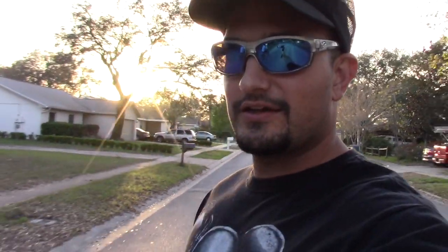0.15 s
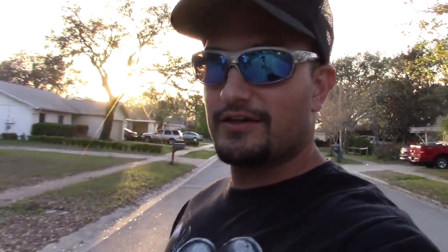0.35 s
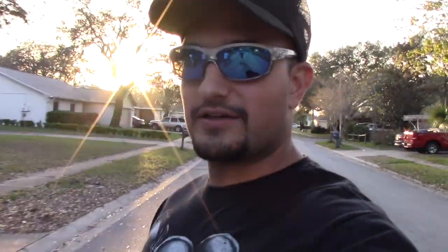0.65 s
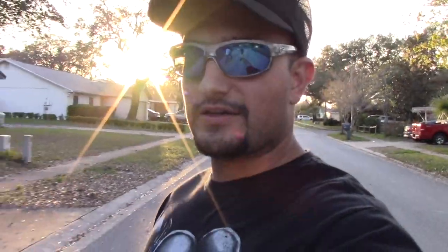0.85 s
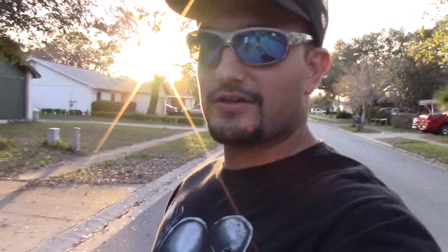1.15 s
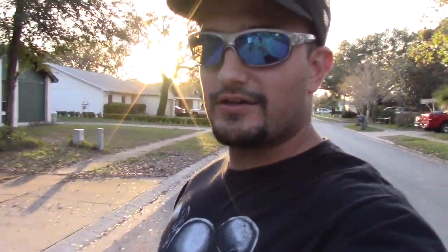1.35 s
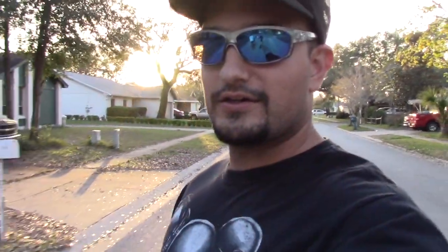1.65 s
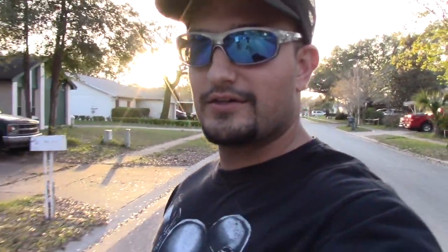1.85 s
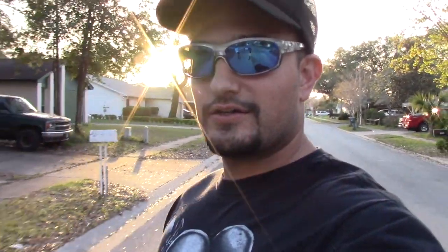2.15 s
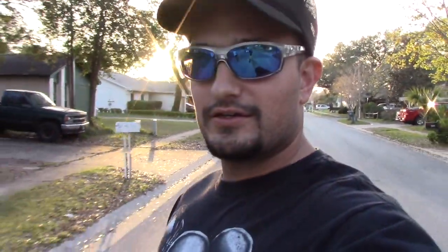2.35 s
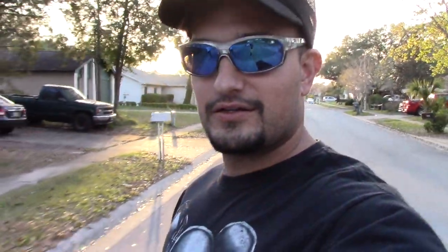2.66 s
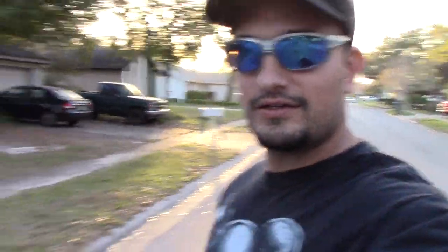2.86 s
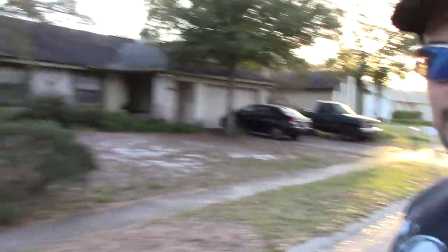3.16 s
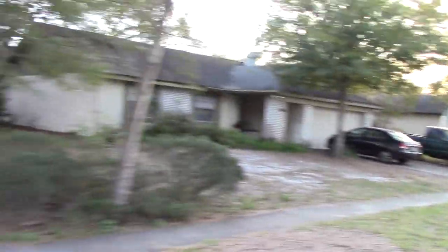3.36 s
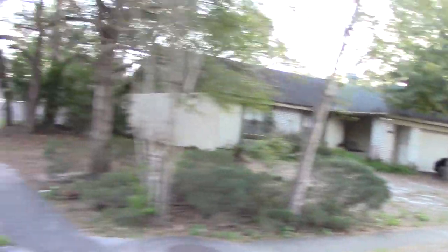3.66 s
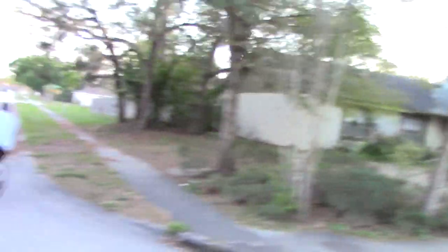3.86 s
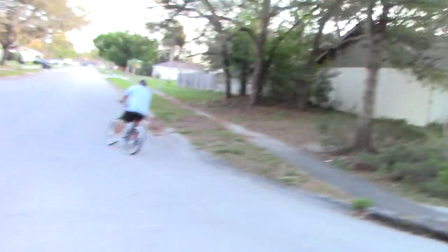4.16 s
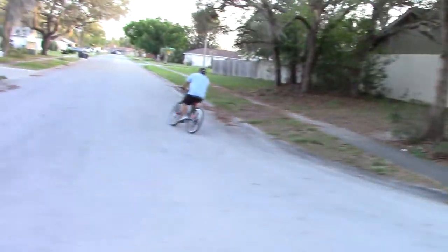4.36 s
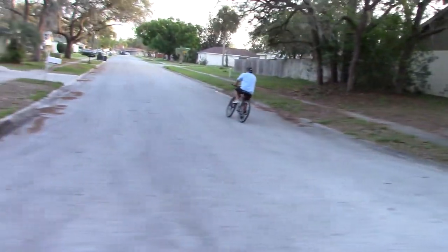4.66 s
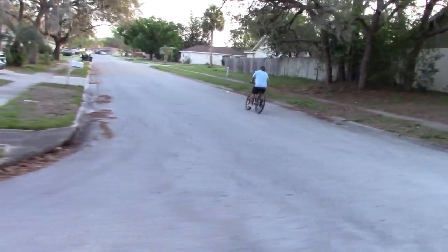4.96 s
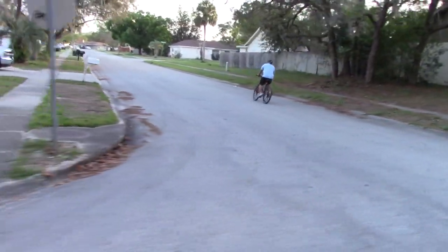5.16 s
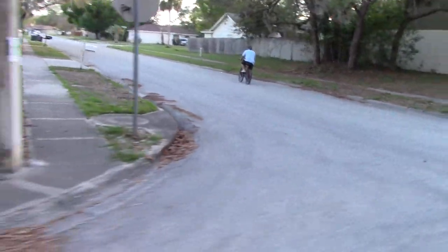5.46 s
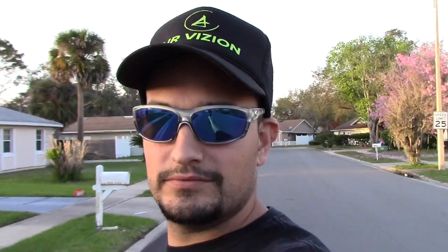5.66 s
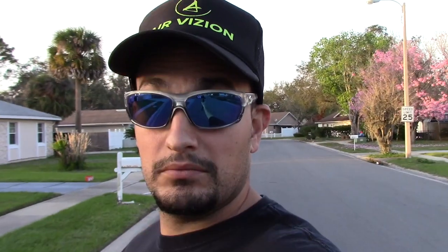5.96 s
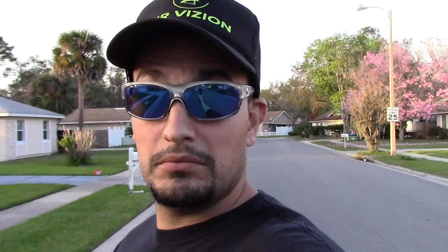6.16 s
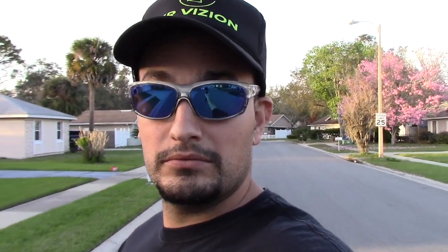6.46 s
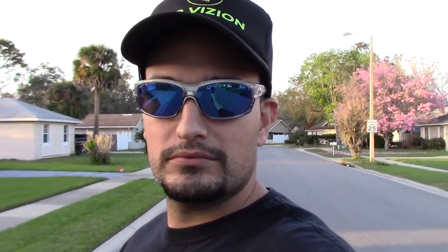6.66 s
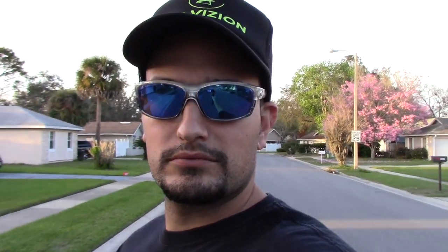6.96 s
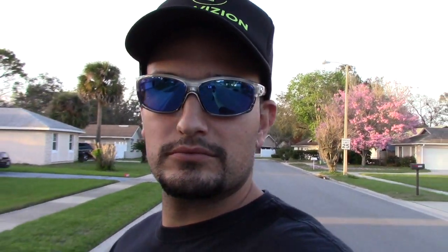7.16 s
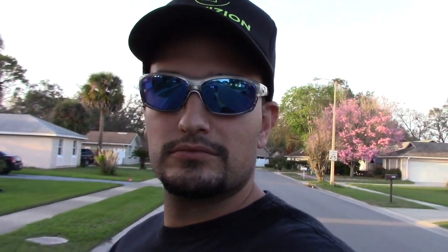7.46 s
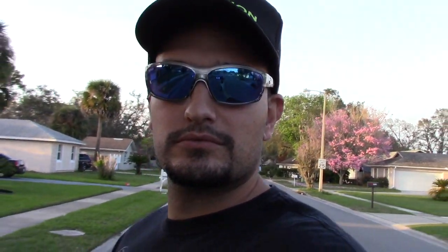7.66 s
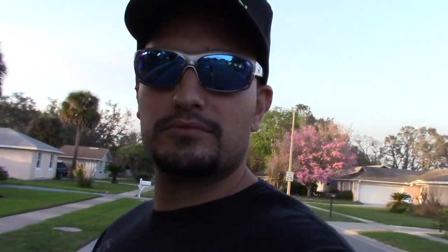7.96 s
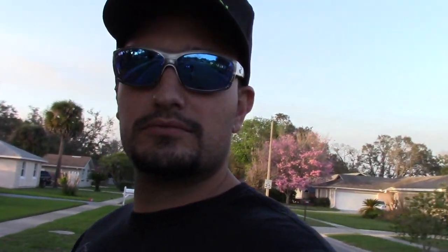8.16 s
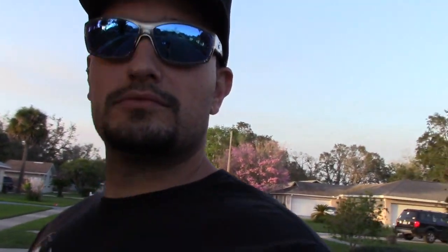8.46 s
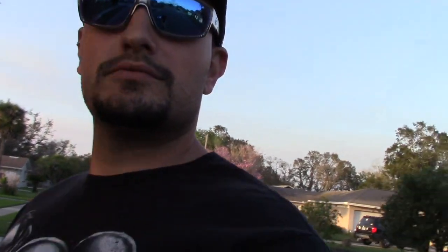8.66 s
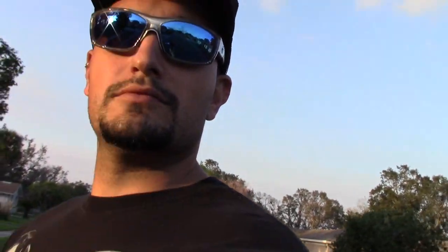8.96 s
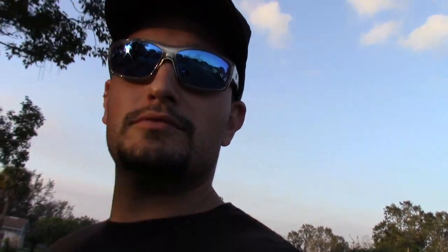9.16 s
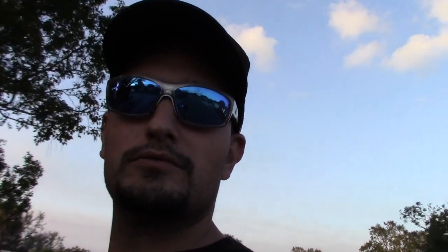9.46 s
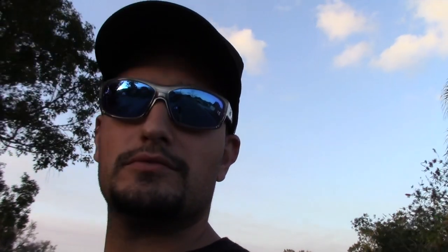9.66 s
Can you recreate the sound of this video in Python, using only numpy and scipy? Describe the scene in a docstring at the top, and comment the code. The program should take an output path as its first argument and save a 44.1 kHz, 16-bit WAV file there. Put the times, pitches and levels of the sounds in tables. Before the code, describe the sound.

Outdoors on a suburban street, a handheld camera microphone rides on a skateboard. Wheels roar over coarse asphalt, a loose hard part knocks and chatters, grit snaps and low wind thumps. Around three and a half seconds a loud headwind tears across the microphone, easing slightly before a sudden cut. A smoother street follows, much quieter: fine wheel hiss, light fluttering gusts and puffs, and a few late clicks and knocks.

```python
"""An electric skateboard rolls over asphalt, its rider holding a camera at arm's length. At first the wheels
roar as shaped noise, a loose hard part rings at the bumps, bright snaps crack, and slow noise buffets the
microphone. At 3.4 s the camera has swung forward and the headwind, noise read faster or slower with the air
speed, tears across its grille. At 5.67 s the scene cuts to a smoother street: fluttering noise makes light
gusts over the hiss of the wheels, with a few late knocks and bright snaps."""
import sys
import numpy as np
from scipy import signal
from scipy.fft import rfft, irfft
from scipy.io import wavfile
from scipy.ndimage import uniform_filter1d, map_coordinates

SR = 44100
rng = np.random.default_rng(int(sys.argv[2]) if len(sys.argv) > 2 else 0)


def transcribe(u):
    """Save the signal u as a 16-bit wav file named by the first command-line argument.

    u: samples, shape (n,) or (channels, n), limited to [-1, 1]; the rate is SR.
    q: integer samples, one column per channel.
    """
    v = np.clip(np.atleast_2d(u).T, -1, 1)
    q = np.round(v * 32767).astype(np.int16)
    wavfile.write(sys.argv[1], SR, q)


N = 433062
T = np.arange(N) / SR
CUT_S = 5.67
OPPOSITE = np.array([[1], [-1]])  # a signal with opposite signs at the left and right port

# All levels in dB are relative: each layer is trimmed again in the mix.

# Roar of the wheels on the coarse street. Each row: time in seconds, level in dB.
ROLL = [(0, -29), (.6, -40), (1.0, -35.5), (2.2, -36.5), (2.55, -34.5), (2.74, -33), (2.86, -32),
        (2.9, -36), (3.03, -39.5), (3.3, -42.5), (5.67, -60)]
# Spectrum of that roar. Each row: frequency in Hz, density in dB per Hz.
ROLL_COLOUR = [(40, -43), (90, -34), (160, -11.5), (330, -4.5), (600, 1), (900, 3), (1200, -2),
               (1600, -5.5), (1950, 4), (2500, -15.5), (4000, -21.5), (8000, -38), (15000, -55)]
# The rumble swells and sinks with the roar: dB of bass for each dB of roar away from the pivot.
RUMBLE_FOLLOWS, RUMBLE_PIVOT_DB, RUMBLE_HZ = 0.73, -38, 460
# The rumble ducks while the camera swings round.
LULL_S, LULL_WIDTH_S, LULL_DB = 3.02, 0.17, -6
# Hiss of the wheels on the coarse and the smooth street. Each row: frequency in Hz, density in dB per Hz.
COARSE_HISS = [(100, -51), (900, -0.5), (2000, 8.5), (3000, 3.5), (4400, -1), (6200, -3), (7500, -11.5),
               (9500, -15.5), (11500, -25), (15000, -54)]
SMOOTH_HISS = [(100, -21), (1000, -9.5), (2000, 8.5), (2900, 3.5), (3600, -1.5), (4350, 3.5), (5100, -2.5),
               (6100, -5), (7200, -13), (9500, -21), (11000, -29), (15000, -41)]
# The coarse hiss follows the roar a little: dB for each dB of roar away from the pivot.
HISS_FOLLOWS, HISS_PIVOT_DB = 0.15, -36.5

# Hardest knocks of the loose part. Each row: start in seconds, level in dB, centre pitch of the ring in Hz,
# crack over the ring in dB.
KNOCKS = [(0.0084, -9, 1969, -2), (0.07, -12, 1940, 5), (0.3069, -18, 1930, 5), (0.3277, -20, 1957, 2),
          (0.3536, -17, 1950, 0), (0.363, -17, 1950, -2), (0.3859, -4.5, 1901, -1), (0.503, -11, 1864, 3.5),
          (0.534, -17, 1950, 0), (0.5527, -12, 1939, -1), (0.5906, -17.5, 1953, 0), (0.652, -15, 1920, 0.5),
          (0.663, -22, 1953, -3), (0.7894, -19.5, 1950, -2), (0.811, -24, 1950, 0), (0.826, -13.5, 1902, 3),
          (0.8384, -14, 1940, 3), (0.9139, -23, 1950, 0), (1.0528, -23, 1950, -3), (1.07, -21, 1950, -3),
          (1.082, -20, 1945, -3), (1.1282, -19.5, 1950, -2), (1.202, -21, 1980, 0), (1.2676, -12, 1973, 0),
          (1.3816, -23, 1947, 2), (1.513, -22, 1954, 5), (1.6854, -20, 1944, 0), (1.9368, -21, 1950, 0),
          (1.9572, -22, 1950, 3), (2.0354, -22, 1950, -2), (2.1881, -19.5, 1950, -1),
          (2.31, -24.5, 1950, 0), (2.345, -18, 1950, 4), (2.3545, -11.5, 1938, -1.5), (2.36, -17, 1942, -4),
          (2.4635, -8, 1922, -2.5), (2.469, -24, 1913, 5), (2.509, -27, 1947, -2), (2.5445, -19, 1948, -4),
          (2.589, -23, 1952, 2), (2.5991, -12, 1960, 1), (2.8333, -12, 1918, -3), (2.9328, -23, 1934, 3),
          (2.9664, -17, 1917, 2), (3.0486, -4, 1962, -4.5), (3.107, -19, 1947, 0),
          (3.1142, -13.5, 1902, -2), (3.119, -16, 1946, -5), (3.1258, -14, 1944, -3),
          (3.1377, -9.5, 1888, 0.5), (3.148, -21, 1951, -8), (9.028, -28, 1954, 11),
          (9.0657, -17.5, 1977, 6), (9.0763, -21, 1982, 0), (9.647, -32, 1951, 10)]
# Modes of the ring. Each row: multiple of the mean knock pitch, level in dB, t60 in seconds.
RATTLE_MODES = [(1, 1, 0.015), (1.075, -11, 0.017), (0.972, -23, 0.1), (0.43, -15, 0.009)]
# Spectrum of the crack at contact. Each row: frequency in Hz, density in dB per Hz.
CRACK_COLOUR = [(100, -50), (350, -25), (600, 0.5), (850, 10), (1200, 3.5), (2000, 9.5), (3000, -4),
                (4500, -6.5), (6300, -12), (7500, -25), (11000, -39), (15000, -54)]
# Lighter clacks come at random, louder where the wheels roar more.
CLACKS_PER_S, CLACK_OVER_ROLL_DB = 18, 7

# Loudest bright snaps: some sharpen the crack of the hardest knocks of the loose part, others are stones under
# the wheels. Each row: start in seconds, level in dB, centre frequency in Hz.
SNAPS = [(.0705, -28, 5000), (.116, -22.5, 7400), (.241, -31, 5330), (.507, -26, 5030), (.814, -31, 4770),
         (.830, -27, 4800), (1.075, -31, 5890), (1.092, -34, 5920), (1.267, -31, 4230), (1.443, -32, 3920),
         (1.515, -33, 6200), (1.902, -39, 11000), (1.959, -36, 3090), (3.0487, -17, 3900),
         (3.1375, -22, 4660), (6.903, -36, 3300), (8.280, -46, 11000), (8.7245, -26.5, 3900),
         (9.065, -28, 4170), (9.648, -31, 3800)]

# Low buffeting behind the rider's body. Each row: time in seconds, strength in dB.
BUFFET = [(0.0, -20), (0.12, -17), (0.2, -22), (0.3, -20), (0.33, -16.5), (0.39, -17), (0.47, -19),
          (0.54, -17), (0.6, -27.5), (0.7, -33.5), (0.77, -33), (0.82, -33.5), (1.03, -30), (1.09, -22.5),
          (1.17, -27), (1.23, -26), (1.43, -29.5), (1.58, -23), (1.63, -24.5), (1.68, -28), (1.74, -23),
          (1.79, -27), (1.87, -20.5), (1.94, -23), (1.98, -27.5), (2.03, -24.5), (2.08, -25.5), (2.15, -43)]
# Spectrum of the buffeting. Each row: frequency in Hz, density in dB per Hz.
BUFFET_COLOUR = [(30, -49), (60, -43), (100, -21.5), (170, -4.5), (265, 2), (450, -1.5), (650, -7),
                 (900, -13), (1300, -23.5), (2500, -29), (6000, -42), (10000, -48), (15000, -63)]
# Harder buffets reach deeper: dB of bass for each dB of strength away from the pivot.
DEEPENING, DEEP_PIVOT_DB, DEEP_HZ = 0.34, -11, 170
# Heaviest thumps of air. Each row: start in seconds, peak level in dB, t60 in seconds.
THUMPS = [(.241, -14, .02), (.259, -10, 0.042), (.289, -12, .015), (.308, -9, .04), (.377, -9, 0.044),
          (.435, -12, .025), (.521, -8, .03), (1.145, -21, .03), (1.534, -18, .05), (1.602, -13.5, .05),
          (1.645, -13, 0.037), (1.841, -17, .06)]

# Small eddies at the ports on the coarse street. Each row: frequency in Hz, density in dB per Hz.
SWIRL_COLOUR = [(100, -23), (230, -21), (400, -10), (620, 12), (900, 3), (1400, -14), (2500, -48),
                (8000, -59)]
# Strength of these eddies against the buffeting and the wheels.
SWIRL_UNDER_BUFFET_DB, SWIRL_UNDER_ROLL_DB = -51, -27

# Headwind. Each row: time in seconds, air speed before its wobble as a share of a reference speed,
# lag of the right port in samples of air travel.
AIRFLOW = [(3.4, 0.78, 1.5), (3.46, 0.8, 2), (3.5, 0.87, 2), (3.62, 0.76, 0.94), (3.71, 0.84, 1.3),
           (3.78, 0.9, 1.4), (3.87, 0.79, 1.4), (4.11, 0.85, 1.7), (4.18, 0.94, 1.4), (4.47, 0.95, 2.49),
           (4.78, 0.99, 2.33), (5.1, 0.93, 2.15), (5.4, 0.82, 1), (5.67, 0.78, 1.81)]
# The air speed is unsteady: rms share of the speed, changes a second.
SPEED_WOBBLE, WOBBLES_PER_S = .02, 28
# Spectrum of the headwind at the reference speed. Each row: frequency in Hz, density in dB per Hz.
RUSH_COLOUR = [(30, -46), (90, -46), (180, -31), (300, -21), (500, -10.5), (850, 1.5), (1400, 3), (2600, 0),
               (3800, -3.5), (5200, -12.5), (7500, -26.5), (10000, -40), (15000, -63)]
# The headwind sets in as the camera swings round, overshoots, then follows the air speed.
RUSH_START_S, RUSH_ATTACK_S = 3.403, .045
RUSH_DB, RUSH_DB_PER_SPEED = -17.5, 3.5
SURGE_S, SURGE_WIDTH_S, SURGE_DB = 3.497, 0.027, 4.5
# It eases off as the camera turns aside.
EASE_START_S, EASE_DB_PER_S = 4.94, 3
# Its treble opens later than its body: dB at the start, time constant in seconds.
OPENING_DB, OPENING_S = -6.5, 0.06
# Spectrum of the tiny cracks on the grille. Each row: frequency in Hz, density in dB per Hz.
CRACKLE_COLOUR = [(300, -35), (1500, -9), (3500, 1), (5500, -5), (8000, -11), (11000, -27), (15000, -33)]
# The cracks are louder in faster air: dB for a rise in speed of one reference speed.
CRACKLE_DB_PER_SPEED = 25
# Sharpest puffs on the grille, on both streets. Each row: start in seconds, peak level in dB, t60 in seconds.
PUFFS = [(3.433, -12, 0.042), (3.455, -10.5, 0.057), (3.492, -9.5, 0.033), (3.541, -14, .025),
         (3.58, -25, .02), (3.76, -18, .14), (3.865, -14, 0.032), (4.055, -15, 0.034), (6.335, -28, .04),
         (6.581, -28, .04), (6.619, -36, .03), (6.832, -29, .04), (6.848, -28, .03), (6.968, -31, .04),
         (7.238, -25, .05), (7.258, -33, .04), (7.316, -24, .05), (7.389, -25, .03), (7.4, -28, .04),
         (7.428, -20.5, 0.041), (7.496, -20, 0.027), (7.519, -29, .04), (8.488, -27, 0.028),
         (8.856, -28, 0.033), (9.027, -22, 0.027), (9.057, -26, 0.023), (9.065, -25, 0.025),
         (9.239, -23, .06), (9.277, -22, .03), (9.313, -20, .025), (9.35, -18.5, 0.027), (9.41, -21.5, .04),
         (9.644, -19.5, 0.033), (9.661, -21, .02), (9.686, -25, .025)]

# Light gusts on the smooth street. Each row: time in seconds, strength in dB.
GUSTS = [(5.7, -51), (5.95, -40.5), (6.12, -37.5), (6.19, -41.5), (6.3, -35), (6.36, -35.5), (6.45, -41),
         (6.57, -33.5), (6.64, -38), (6.78, -35.5), (6.85, -35.5), (6.92, -34), (7.0, -38.5), (7.12, -35.5),
         (7.2, -37), (7.32, -33), (7.36, -34.5), (7.42, -33), (7.53, -38.5), (7.6, -34.5), (7.65, -40),
         (7.7, -34.5), (7.9, -47), (8.4, -41), (8.7, -36), (8.9, -35), (8.98, -34), (9.07, -31.5),
         (9.12, -36.5), (9.19, -35.5), (9.27, -29), (9.36, -34.5), (9.47, -37.5), (9.55, -42.5),
         (9.66, -32), (9.75, -34), (9.82, -42)]
# Spectrum of the gusts. Each row: frequency in Hz, density in dB per Hz.
GUST_COLOUR = [(40, -61), (90, -32), (160, -12.5), (270, -5.5), (400, -3), (550, 3.5), (800, 4),
               (1200, -1.5), (1600, -6), (2100, -11.5), (3000, -21), (4500, -34), (9000, -47.5),
               (15000, -81)]
BREEZE_DB = -38  # a steady breeze under the gusts
# Tearing adds brightness with strength; at TEAR_DB it doubles the part above TEAR_HZ.
TEAR_DB, TEAR_HZ = -27.5, 1300

TOP_HZ = 15700


def undb(db):
    """Decibels to gain."""
    return 10 ** (np.asarray(db) / 20)


def unit(x):
    """Scale to rms 1."""
    return x / np.sqrt(np.mean(x ** 2))


def curve(rows):
    """Each column of a table, joined by straight lines in time."""
    s, *columns = np.transpose(rows)
    return [np.interp(T, s, c) for c in columns]


def colour(x, points, size=8192):
    """Causal minimum-phase filter with a (Hz, dB) response that keeps the power of white noise."""
    hz, db = np.transpose(points)
    f = np.maximum(np.fft.rfftfreq(size, 1 / SR), 1)
    gain = unit(undb(np.interp(np.log(f), np.log(hz), db)))
    cepstrum = irfft(np.log(gain), size)
    # folding the cepstrum forward in time makes the filter causal
    cepstrum[1:size // 2] *= 2
    cepstrum[size // 2 + 1:] = 0
    response = irfft(np.exp(rfft(cepstrum)), size)[:size // 2]
    return signal.oaconvolve(x, response[None], axes=1)[:, :N]


def lows(x, hz):
    """The part of x below hz, without phase shift, so that x minus it is the rest."""
    return signal.sosfiltfilt(signal.butter(2, min(hz, SR * .45), fs=SR, output="sos"), x)


def tilt_lows(x, db, hz):
    """Raise or cut the part of x below hz by a moving number of dB."""
    return x + (undb(db) - 1) * lows(x, hz)


def ports(split_hz, own=1, order=2):
    """Broad noise at two close ports: shared in the bass, less alike above split_hz; own scales the difference."""
    mid, side = rng.standard_normal((2, N))
    high_pass = signal.butter(order, min(split_hz, SR * .45), "high", fs=SR, output="sos")
    side = own * signal.sosfilt(high_pass, side)
    return np.array([mid + side, mid - side])


def walk(rate):
    """Random levels, rate of them a second, joined by slopes; rms 1."""
    k = max(int(SR / rate), 1)
    steps = np.repeat(rng.standard_normal(N)[:N // k + 1], k)
    return unit(uniform_filter1d(steps, k)[:N])


def eddies(slow_rate, slow_db, fast_rate, fast_db):
    """Turbulence: large eddies swell the level, small ones make it flutter within a soft limit."""
    return unit(undb(slow_db * walk(slow_rate) + fast_db * 2 * np.tanh(walk(fast_rate) / 2)))


def wander(x, share, rate):
    """Eddies differ in size, so the pitch of their noise strays up and down by an rms share."""
    stray = uniform_filter1d(walk(rate), int(SR / rate))
    stray = stray * share / np.std(np.diff(stray))
    moments = np.arange(N) + stray
    return np.array([map_coordinates(port, [moments], order=3, mode="mirror") for port in x])


def strikes(rows):
    """One impulse for each (s, dB) row."""
    s, db = np.transpose(rows)
    return np.bincount(np.clip(s * SR, 0, N - 1).astype(int), undb(db), N)


def sparse(rate, scatter_db):
    """Impulses of uneven size at random moments, on average rate of them a second."""
    sizes = undb(scatter_db * np.clip(rng.standard_normal(N), -2, 2))
    return (rng.random(N) < rate / SR) * sizes


def ring(x, shape):
    """Every impulse in x starts one copy of shape."""
    return signal.oaconvolve(x, shape)[:N]


def fade(rise_s, t60):
    """A soft rise and an exponential fall, peak 1."""
    t = T[:SR // 6]
    shape = (1 - np.exp(-(t / rise_s) ** 2)) * np.exp(-np.log(1000) * t / t60)
    return shape / shape.max()


def bursts(rows):
    """Level of short bursts of air pressure with a steep front, one for each (s, dB, t60) row."""
    out = np.zeros(N + SR)
    for s, db, t60 in rows:
        shape = undb(db) * fade(rise_s=0.00079, t60=t60)
        start = int(s * SR)
        out[start:start + len(shape)] += shape
    return out[:N]


def wheels(first_street):
    """Hard wheels roar on the stones of the asphalt, deeper when louder, with a finer hiss above."""
    db = curve(ROLL)[0]
    roar = colour(ports(split_hz=45000), ROLL_COLOUR) * undb(db)
    roar *= eddies(slow_rate=22, slow_db=1.56, fast_rate=300, fast_db=1.5)
    lull_db = LULL_DB * np.exp(-((T - LULL_S) / LULL_WIDTH_S) ** 2)
    roar = tilt_lows(roar, RUMBLE_FOLLOWS * (db - RUMBLE_PIVOT_DB) + lull_db, RUMBLE_HZ)
    stones = eddies(slow_rate=24, slow_db=-0.3, fast_rate=330, fast_db=2.0)
    coarse = undb(-40.0) * colour(ports(split_hz=13900, own=5.4, order=3) * stones, COARSE_HISS)
    coarse = coarse * undb(HISS_FOLLOWS * (db - HISS_PIVOT_DB))
    smooth = undb(-41.0) * colour(ports(split_hz=11300, own=1.7, order=3), SMOOTH_HISS)
    return first_street * (roar + coarse) + (1 - first_street) * smooth


def rattle(first_street, rebound_db=-14, detune_hz=40, lead_rad=0.0077, tick_db=-4):
    """Bumps knock a loose part, which rebounds twice; the coarse road keeps it chattering and ticking."""
    s, db, hz, crack_db = np.transpose(KNOCKS)
    chance = rng.random((len(s), 2)).T
    first = strikes(np.c_[s + .004 + .003 * chance[0], db + rebound_db])
    second = strikes(np.c_[s + .009 + .012 * chance[1], db + rebound_db - 3])
    shaking = undb(curve(ROLL)[0]) * first_street
    chatter = undb(-3.0) * sparse(rate=110, scatter_db=6.0)
    clacks = undb(CLACK_OVER_ROLL_DB) * sparse(rate=CLACKS_PER_S, scatter_db=3.5)
    chatter = (chatter + clacks) * shaking
    blows = undb(2.0) * (strikes(np.c_[s, db]) + first + second) + chatter

    # the part seats differently at each blow, which shifts its pitch
    latest_knock = np.maximum(np.searchsorted(s, T, side="right") - 1, 0)
    pitch = hz[latest_knock] + detune_hz * walk(rate=60)
    turns = np.exp(2j * np.pi * np.cumsum(pitch - hz.mean()) / SR)
    body = 0
    for ratio, gain_db, t60 in RATTLE_MODES:
        tone = np.exp(2j * np.pi * ratio * hz.mean() * T[:SR // 6])
        body = body + undb(gain_db) * fade(rise_s=0.003, t60=t60) * tone
    arrival = np.exp(1j * lead_rad * OPPOSITE)  # the ring reaches one port a little sooner
    ringing = np.imag(ring(blows, body) * turns * arrival)

    # square blows crack; glancing ones only tick, without a ring
    ticks = undb(tick_db) * sparse(rate=35, scatter_db=10.0) * shaking
    contacts = undb(2.0) * (strikes(np.c_[s, db + crack_db]) + first + second) + chatter + ticks
    crack = ring(contacts, fade(rise_s=0.00075, t60=0.029)) * ports(split_hz=25000, order=2)
    return undb(-3.5) * ringing + undb(-12) * colour(crack, CRACK_COLOUR)


def bright_snaps(count=110, fine_db=-45, width=0.5):
    """Bright snaps as short noise bands: the loudest sharpen hard knocks or come from stones under the wheels;
    finer grit is strewn over the first 2.5 s."""
    when, size, pitch = rng.random((count, 3)).T
    fine = np.c_[2.5 * when, fine_db + 10 * size ** 4, 4200 + 3200 * pitch]
    out = np.zeros((2, N + SR // 6))
    shape = fade(rise_s=0.00027, t60=0.02)[:SR // 25]
    for s, db, hz in np.vstack([SNAPS, fine]):
        # width is the natural log of the ratio of the band edges
        edges = np.minimum(hz * np.exp(np.array([-width, width]) / 2), [SR * .4, SR * .45])
        band = signal.butter(2, edges, "band", fs=SR)
        mid, side = unit(signal.lfilter(*band, rng.standard_normal((2, len(shape)))))
        snap = mid + (hz / 11000) ** 2 * side * OPPOSITE  # higher snaps differ more between the ports
        start = int(s * SR)
        out[:, start:start + len(shape)] += undb(db - 3.5) * shape * snap
    return out[:, :N]


def buffet():
    """Slow, heavy eddies thump on the microphone, deeper when harder, and die away as the air turns."""
    db = curve(BUFFET)[0]
    strength = undb(db) * np.interp(T, [2.1, 2.2], [1, 0])
    turbulence = eddies(slow_rate=50, slow_db=0.5, fast_rate=210, fast_db=1.6)
    push = np.hypot(strength * turbulence, undb(-3.5) * bursts(THUMPS))
    thumps = colour(ports(split_hz=25000) * push, BUFFET_COLOUR)
    thumps = wander(thumps, share=.06, rate=25)
    return undb(0.74) * tilt_lows(thumps, DEEPENING * (db - DEEP_PIVOT_DB), DEEP_HZ)


def swirl(first_street):
    """The passing air leaves small eddies that push the two ports against each other."""
    from_buffet = undb(curve(BUFFET)[0] + SWIRL_UNDER_BUFFET_DB)
    from_wheels = undb(curve(ROLL)[0] + SWIRL_UNDER_ROLL_DB)
    strength = np.hypot(from_buffet, from_wheels)
    air = rng.standard_normal(N) * eddies(slow_rate=20, slow_db=-1.5, fast_rate=300, fast_db=11.0)
    return colour(air * strength * OPPOSITE, SWIRL_COLOUR) * first_street


def rush_db(speed):
    """Level of the headwind: it follows the air speed, with a surge at first and an easing at the end."""
    surge = SURGE_DB * np.exp(-((T - SURGE_S) / SURGE_WIDTH_S) ** 2)
    easing = EASE_DB_PER_S * np.maximum(T - EASE_START_S, 0)
    return RUSH_DB + RUSH_DB_PER_SPEED * (speed - 1) + surge - easing


def crackle(crackle_db=-30):
    """The smallest eddies break on the grille as tiny bright cracks."""
    snaps = ring(sparse(rate=140, scatter_db=8), fade(rise_s=.0003, t60=.008))
    return undb(crackle_db) * unit(colour(snaps * ports(split_hz=5000, order=1), CRACKLE_COLOUR))


def headwind(first_street, thinning_db=-30):
    """Air tears across the grille; the faster it flows, the higher and thinner it sounds."""
    speed, lag = curve(AIRFLOW)
    speed = speed * (1 + SPEED_WOBBLE * walk(WOBBLES_PER_S))
    travel = np.cumsum(speed)  # distance that the air has moved, in samples
    air = ports(split_hz=5200, own=0.69, order=1)
    grain = eddies(slow_rate=200, slow_db=0.8, fast_rate=900, fast_db=2.4)
    left, right = colour(air * grain, RUSH_COLOUR)
    # each eddy reaches the left port first, and is a little brighter there
    left = map_coordinates(left, [travel], order=3, mode="mirror")
    right = map_coordinates(right, [travel - lag], order=3, mode="mirror")
    left = left + undb(-3.5) * (left - uniform_filter1d(left, size=5))
    rush = tilt_lows(np.array([left, right]), thinning_db * (speed - 0.8978), hz=610)
    # large and small eddies come and go separately, so the colour keeps shifting
    body = lows(rush, hz=1920)
    rush = body * undb(.7 * walk(rate=30)) + (rush - body) * undb(1.1 * walk(rate=45))
    rush = rush + crackle() * undb(CRACKLE_DB_PER_SPEED * (speed - 0.8))
    opening_db = OPENING_DB * np.exp(-np.maximum(T - RUSH_START_S, 0) / OPENING_S)
    rush = rush + (undb(opening_db) - 1) * (rush - lows(rush, hz=2500))
    # slow pressure swings push on both ports, partly alike
    rush = rush + undb(-49.0) * unit(lows(ports(split_hz=15, own=0.51), hz=130))
    attack = np.clip((T - RUSH_START_S) / RUSH_ATTACK_S, 0, 1)
    level = np.hypot(attack * undb(rush_db(speed)), bursts(PUFFS))
    return undb(-.5) * rush * level * first_street


def gusts(first_street):
    """Light gusts flutter on the grille and break into short, thin puffs; the stronger ones are brighter."""
    strength = np.hypot(undb(curve(GUSTS)[0] + 1), undb(BREEZE_DB))
    flutter = strength * eddies(slow_rate=76, slow_db=0.2, fast_rate=550, fast_db=3.7)
    # stronger gusts stir each port separately
    air = ports(split_hz=12000) + undb(15.5) * strength * rng.standard_normal((2, N))
    puffs = colour(ports(split_hz=7200) * bursts(PUFFS), GUST_COLOUR)
    thin_puffs = puffs - lows(puffs, hz=430)
    gust = colour(air * flutter, GUST_COLOUR) + undb(-0.5) * thin_puffs
    tearing = strength / undb(TEAR_DB) * (gust - lows(gust, hz=TEAR_HZ))
    return undb(-1.12) * (gust + tearing) * (1 - first_street)


def scene():
    """Two stretches of street, joined by a cut."""
    first_street = np.clip((CUT_S - T) / .004 + .5, 0, 1)
    board = wheels(first_street) + rattle(first_street) + bright_snaps()
    return board + buffet() + swirl(first_street) + headwind(first_street) + gusts(first_street)


def record(dry):
    """The camera rounds the very highest peaks and cuts the top."""
    rounded = dry / (1 + (dry / .9) ** 6) ** (1 / 6)
    return signal.sosfilt(signal.ellip(10, .2, 80, TOP_HZ, fs=SR, output="sos"), rounded)


dry = scene()
out = record(dry)
transcribe(out)
```